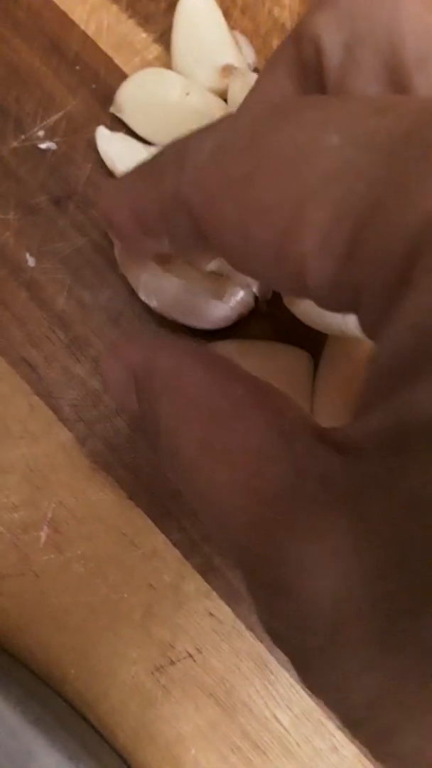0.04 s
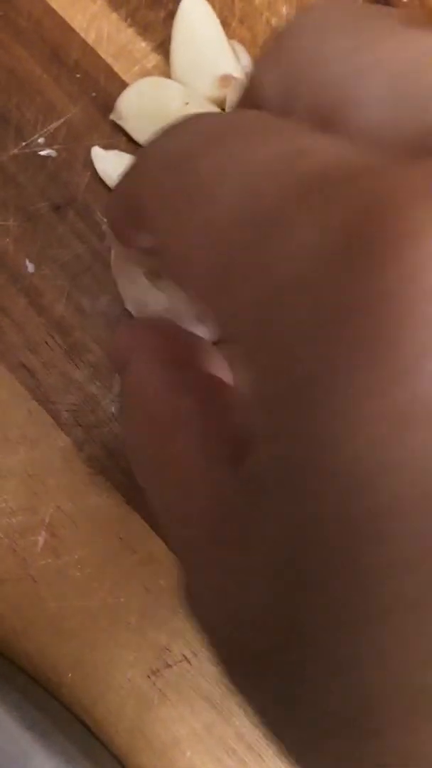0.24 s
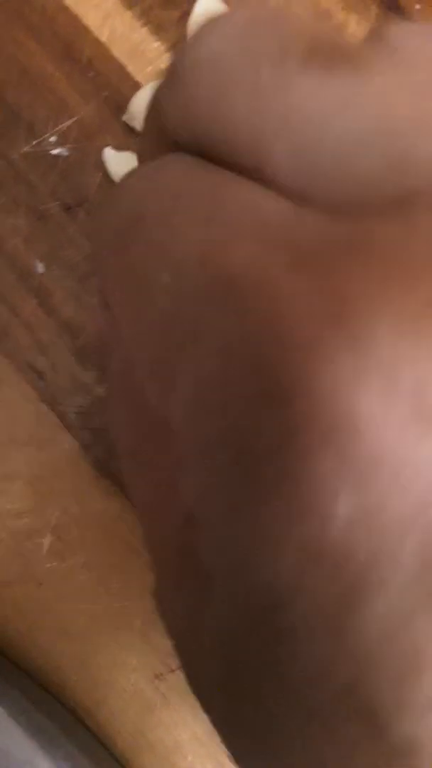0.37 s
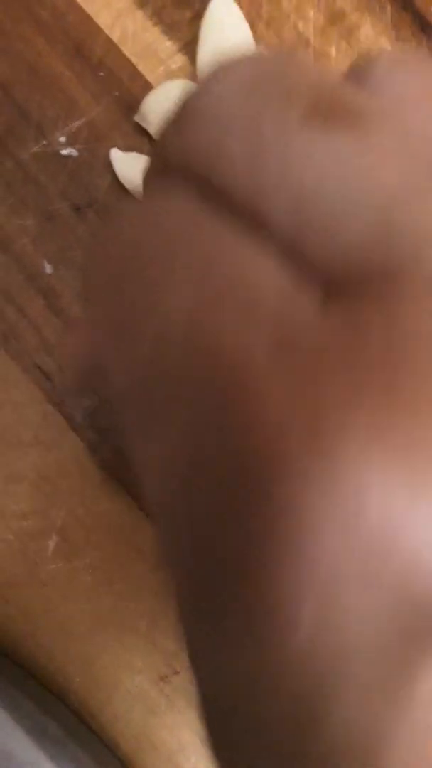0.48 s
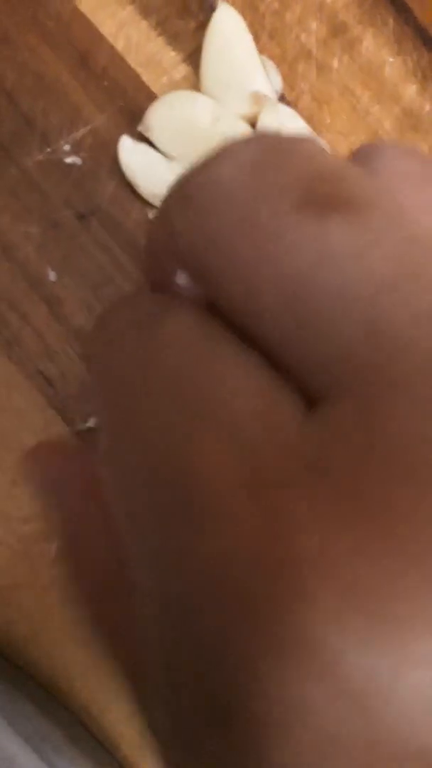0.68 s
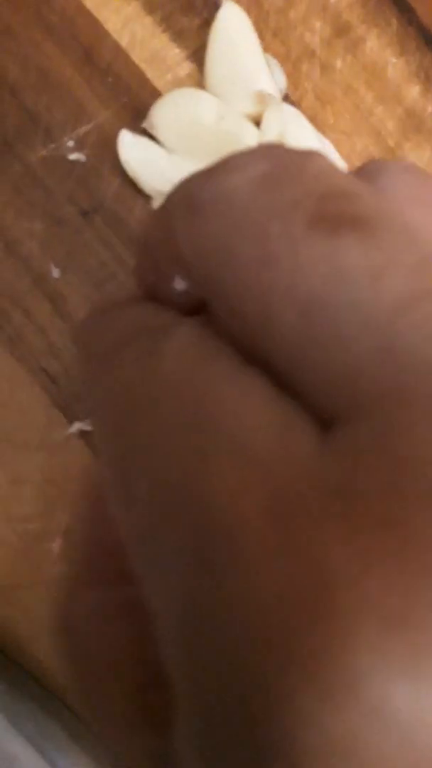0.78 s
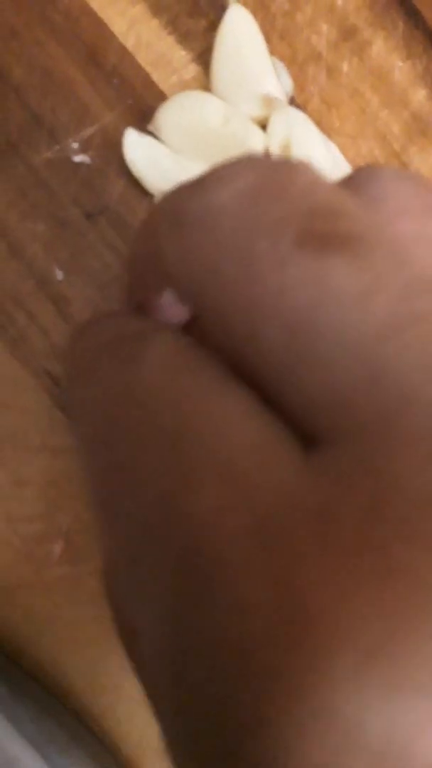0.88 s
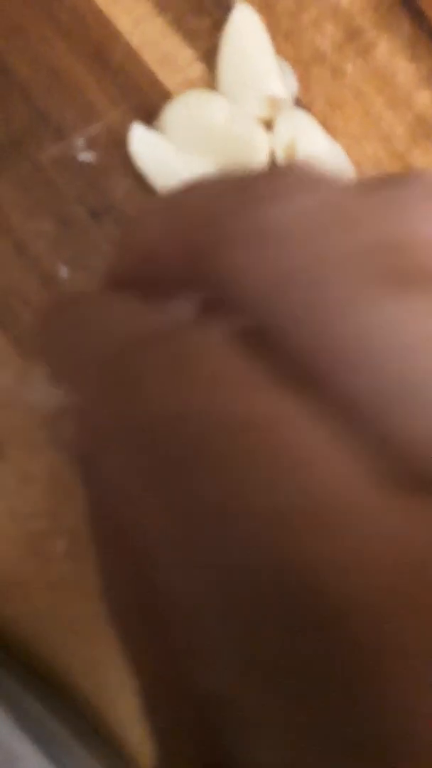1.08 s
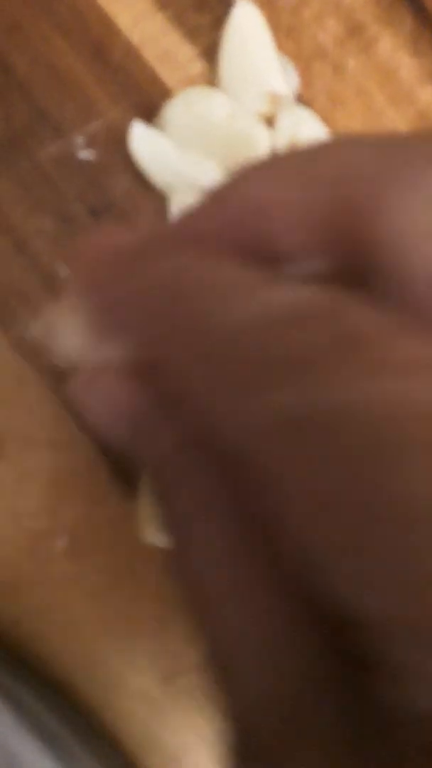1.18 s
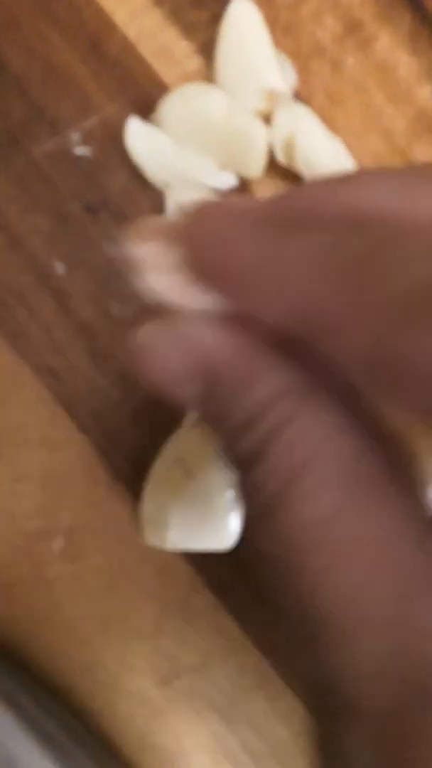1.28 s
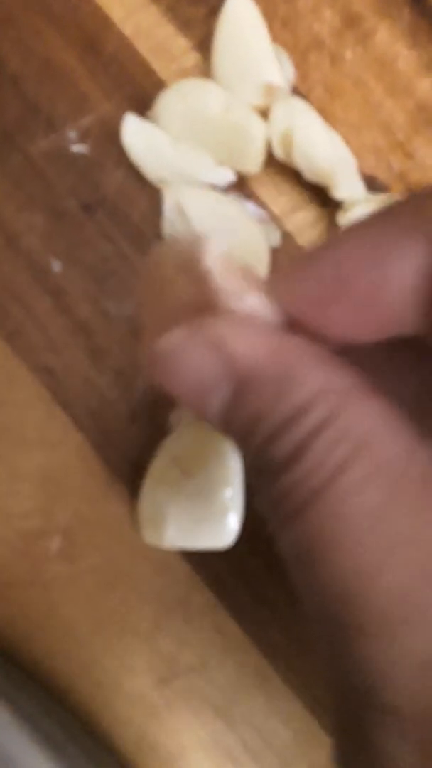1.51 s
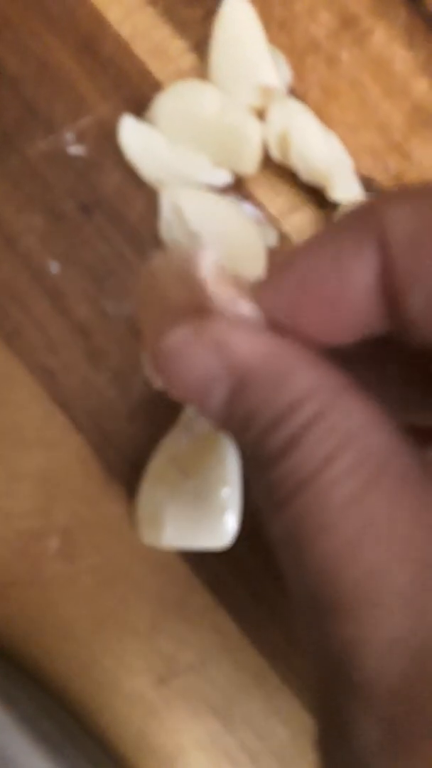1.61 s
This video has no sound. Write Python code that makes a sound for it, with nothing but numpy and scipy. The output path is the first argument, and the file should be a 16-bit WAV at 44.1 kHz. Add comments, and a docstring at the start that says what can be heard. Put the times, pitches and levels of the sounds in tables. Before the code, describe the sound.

Dry garlic skin crackles as fingers peel it, with one soft knock on wood.

```python
"""Dry, papery crackling: fingers peel garlic on a wooden board, close to a phone in a small kitchen.
The skin snaps in single cracks that ring its flakes, and tears in runs of tiny fractures.
Cloves stick and slip over the wood, and one lands with a knock that sets the board ringing.
Underneath, an appliance hums in the steady room noise."""
import sys
import numpy as np
from scipy import signal
from scipy.fft import rfft, irfft
from scipy.io import wavfile
from scipy.ndimage import map_coordinates

SR = 44100
rng = np.random.default_rng(int(sys.argv[2]) if len(sys.argv) > 2 else 0)


def store_wav(level_fs):
    """Save 16-bit WAV to argv[1]."""
    pcm = np.round(np.clip(np.atleast_2d(level_fs), -1, 1) * 32767)
    wavfile.write(sys.argv[1], SR, pcm.T.astype(np.int16))


N = 72765


def skin_cracks():
    """Each snap rings three broad resonances of its flake, which shivers briefly after."""
    # single snaps (time [s], level [dB], treble over the mid band [dB], left minus right [dB])
    snaps = [(0.0361, -52, -2.5, 10), (0.0963, -54, -5.5, 8), (0.2429, -45, 1, 14.5), (0.3478, -55.5),
             (0.3628, -49, 3, 1.5), (0.4546, -45.5, 10, 4), (0.5192, -49.5, -0.5, 1),
             (0.5852, -63, 9.5, -15), (0.5942, -55.5), (.9146, -47, 5.5, -2.5), (0.9305, -61.5),
             (0.9803, -53.5), (0.9995, -55), (1.0112, -51.5, 2, 6.5), (1.0745, -63), (1.1777, -47.5, 7, 10),
             (1.1976, -39.5, 3, 3.5), (1.2305, -48, -20, 2), (1.2475, -44, 3, 4.5), (1.31, -52),
             (1.3456, -42, 3, 1), (1.356, -38.5, 6.5, 6.5), (1.3868, -48.5, 12.5, 1.5), (1.563, -60),
             (1.5672, -59), (1.6146, -61), (1.6438, -47.5)]
    snaps = [(*row, 3.5, 0)[:4] for row in snaps]  # short rows: usual treble, centred
    resonances = [(3430, 890), (6930, 2250), (12580, 6500)]  # (centre [Hz], width [Hz])
    snap_s, shiver_s, shiver_db = .00065, .003, -13
    softening = .25  # faint cracks die more slowly: dB of decay time per dB of level
    loudest = max(db + max(treble_db, 0) for _, db, treble_db, _ in snaps)
    out, t = np.zeros((2, N)), np.arange(SR // 20) / SR
    for start, db, treble_db, pan_db in snaps:
        age = t / undb(softening * (loudest - db - max(treble_db, 0)))
        attack = 1 - np.exp(-age / .0001)
        envelope = attack * (np.exp(-age / snap_s) + undb(shiver_db) * np.exp(-age / shiver_s))
        tuning = 1 + .037 * rng.standard_normal()
        bands_db = (treble_db - 20, 0, treble_db)  # hard snaps fill the outer two resonances
        snap = 0
        for (hz, width), band_db in zip(resonances, bands_db):
            burst = envelope * rng.choice([-1, 1], (3, len(t)))
            ring = mic_ports(resonate(burst, hz * tuning, width))
            energy = np.sum(ring ** 2, axis=1, keepdims=True)
            snap = snap + undb(band_db) * ring / np.sqrt(energy / (.004 * SR))  # level over 4 ms
        add(out, start, undb(db) * pan(pan_db) * snap)
    return out


def skin_tears():
    """Tiny fractures run through the papery skin, bunching where it snags."""
    # runs of tearing and rustling (peak time [s], rise [s], fall [s], level [dB], tilt [dB/octave])
    runs = [(.04, 0.019, 0.026, -58, -4.5), (0.099, 0.019, 0.017, -55.5, -2), (.232, 0.015, 0.016, -56, -5),
            (0.244, 0.001, 0.038, -40, -2.8), (0.293, 0.015, 0.016, -30.7, 1.3),
            (.319, .008, 0.0029, -37.5, 3.5), (0.366, 0.06, 0.055, -52, -6),
            (0.458, 0.025, 0.036, -45.5, -4.5), (0.521, 0.002, 0.033, -49.5, -3),
            (0.589, 0.012, 0.02, -54, -4), (0.62, 0.0049, 0.028, -55, -5.5), (0.883, 0.053, 0.059, -59, -6),
            (1.002, 0.042, 0.03, -54.5, -1), (1.173, 0.015, 0.034, -49, -1),
            (1.199, 0.0032, 0.0083, -37.5, 0), (1.25, 0.075, 0.14, -55.5, -7.5),
            (1.37, 0.07, 0.06, -54, 0.5), (1.59, .11, .15, -63, 3)]
    # tone of the dry skin (frequency [Hz], level [dB])
    skin_tone = [(300, -30), (1200, -18), (2000, -3), (2700, -10.5), (4300, -1), (5300, 0.5), (7500, 1),
                 (9500, 0), (12500, 1), (16000, 2)]
    snag_s, snag_gain = .0009, 1.2
    thinning = .14  # light runs move only small flakes: dB of body lost per dB of level
    catches = np.abs(grains(per_s=300, spread_db=1.5)[0])
    snags = signal.lfilter([1], [1, -np.exp(-1 / (snag_s * SR))], catches)
    fractures = mic_ports(grains(per_s=6000, spread_db=2.2)) * (1 + snag_gain * snags)
    loudest = max(row[3] for row in runs)
    out = 0
    for peak, rise, fall, db, tilt_db in runs:
        flakes = colour(fractures, [(4800, thinning * (db - loudest)), (6800, 0)])
        out = out + undb(db) * swell(peak, rise, fall) * unit(colour(flakes, skin_tone, tilt_db))
    return pan(db=1.5) * out


def board_knocks():
    """A clove's dull contact rings the board's modes; a low, diffuse boom builds up in the room."""
    # a light touch, then a clove lands and rocks (time [s], level [dB])
    hits = [(.8225, -58.5), (1.1252, -36), (1.1333, -47)]
    # modes of the board (frequency [Hz], level [dB], t60 [s], left minus right [dB])
    modes = [(396.5, -14, 0.13, 11), (615, 0, 0.135, 0), (701, -4, 0.13, 13), (752, -6, 0.11, -9),
             (868, -9, 0.088, 9), (900, -1, 0.085, 4), (1347, -9, 0.115, -3), (1804, -6, 0.097, -8),
             (1940, -10, 0.086, -15)]
    # tone of the contact (frequency [Hz], level [dB])
    contact_tone = [(120, -8), (800, -6), (2000, -8.5), (2700, -24), (4000, -15), (16000, -40)]
    contact_db, contact_s = -1.5, .0055
    boom_db, boom_rise_s, boom_t60_s = -13.5, .02, .3
    out, t = np.zeros((2, N)), np.arange(SR // 2) / SR
    ring = 0
    for k, (hz, db, t60, pan_db) in enumerate(modes):
        polarity = (-1) ** ((k + 1) // 2)
        ring = ring + polarity * pan(pan_db) * undb(db - 60 * t / t60) * np.sin(2 * np.pi * hz * t)
    boom = unit(mic_ports(resonate(rng.standard_normal((3, len(t))), hz=340, width=320)))
    boom *= (1 - np.exp(-t / boom_rise_s)) * undb(boom_db - 60 * t / boom_t60_s)
    attack = 1 - np.exp(-t / .0006)
    for start, db in hits:
        contact = unit(colour(rng.standard_normal((2, len(t))), contact_tone)) * np.exp(-t / contact_s)
        add(out, start, undb(db) * attack * (ring + undb(contact_db) * contact + boom))
    return out


def clove_slides():
    """Cloves stick and slip on the wood, sounding resonances that drift as the contact moves."""
    # pushes across the board (peak time [s], rise [s], fall [s], level [dB])
    pushes = [(.28, 0.04, .04, -51.5), (.326, 0.0063, 0.005, -51), (.375, .02, .05, -58),
              (0.469, 0.02, 0.027, -51.5), (0.527, 0.01, 0.027, -51.5), (.582, 0.035, 0.018, -54.5),
              (0.863, 0.032, 0.034, -60.5), (1.02, 0.029, 0.08, -62.5), (1.199, 0.045, 0.042, -55)]
    # tone of the rubbed wood (frequency [Hz], level [dB])
    wood_tone = [(90, -42), (740, -3), (920, 8), (1160, -13), (1430, 0), (1680, -14), (1960, -4.5),
                 (3000, -19), (4650, -3), (6000, -18)]
    pressure = np.sqrt(sum((undb(db) * swell(peak, rise, fall)) ** 2 for peak, rise, fall, db in pushes))
    slips = grains(per_s=4100, spread_db=2.5)
    rub = colour(slips[0] + .5 * slips[1:], wood_tone)  # the wide board reaches both mic ports at once
    position = np.cumsum(1 + .012 * waver())  # pitch drifts by about 1.2 %
    drifting = [map_coordinates(port, [position], mode="mirror") for port in rub]
    return pressure * unit(np.array(drifting))


def hand_echoes(x):
    """Hands and board throw back a few very early echoes, different for each mic port."""
    latest_s, echo_db, count = .003, -6.5, 6
    echoes = np.zeros((2, int(latest_s * SR) + 1))
    for port in echoes:
        strengths = undb(echo_db) * rng.choice([-1, 1], count)
        delays = (rng.uniform(.15, 1, count) * (len(port) - 1)).astype(int)
        port[delays] = strengths
    echoes[:, 0] = 1  # direct sound
    return signal.fftconvolve(x, echoes / np.linalg.norm(echoes[0]), axes=1)[:, :N]


def kitchen_reverb(x, wet_db, t60_s=.22):
    """The small kitchen adds a short, diffuse ring."""
    t = np.arange(SR // 2) / SR
    tail = rng.standard_normal((2, len(t))) * undb(-60 * t / t60_s) * (1 - np.exp(-t / .0015))
    return x + undb(wet_db) * signal.fftconvolve(x, unit(tail) / np.sqrt(len(t)), axes=1)[:, :N]


def room_noise(level_db=-64):
    """A steady bed of noise, narrow in the bass and wider in the treble."""
    # tone of the kitchen's background (frequency [Hz], level [dB])
    room_tone = [(30, -18), (60, -3.5), (105, 4), (200, -9), (300, -6), (620, -7), (800, -17.5),
                 (1400, -24), (1950, -15), (2600, -27.5), (7000, -25), (16000, -31)]
    mid, side = colour(rng.standard_normal((2, N)), room_tone)
    side = colour(side, [(60, -14), (1050, -1)])
    return undb(level_db) * unit(np.array([mid + side, mid - side]))


def appliance_hum(waver_depth=.41):
    """An appliance hums on one low note that wavers in level."""
    # the hum's note (frequency [Hz], level [dB])
    hum_notes = [(118.4, -68)]
    t = np.arange(N) / SR
    hum = sum(undb(db) * np.sqrt(2) * np.sin(2 * np.pi * hz * t) for hz, db in hum_notes)
    return hum * (1 + waver_depth * waver())


def grains(per_s, spread_db):
    """Random tiny impulses, mostly weak and a few strong, with three independent sets of signs."""
    sizes = undb(spread_db * np.minimum(rng.exponential(size=N), 4))
    fires = rng.random(N) < per_s / SR
    return sizes * fires * rng.choice([-1, 1], (3, N))


def swell(peak, rise, fall):
    """Finger pressure builds up and lets go."""
    t = np.arange(N) / SR - peak
    return np.exp(-np.abs(t / np.where(t < 0, rise, fall)) ** 1.63)


def waver():
    """A slow random wobble with rms 1."""
    return unit(colour(rng.standard_normal(N), [(12, 0), (40, -40), (200, -100)]))


def mic_ports(three, share=.62, lag_s=.00027):
    """One shared and two separate signals make left and right; the right is slightly late."""
    left, right = np.sqrt(share) * three[0] + np.sqrt(1 - share) * three[1:]
    return np.array([left, np.roll(right, int(lag_s * SR))])


def colour(x, points, tilt_db=0):
    """Equalise by (frequency [Hz], level [dB]) points and a tilt per octave."""
    length = x.shape[-1]
    octave = np.log2(np.arange(length // 2 + 1) * SR / length + 1)
    hz, db = np.array(points).T
    curve_db = np.interp(octave, np.log2(hz), db) + tilt_db * octave
    return irfft(rfft(x) * undb(curve_db), length)


def resonate(x, hz, width):
    """A steep band-pass resonance."""
    edges = [max(hz - width / 2, 20), min(hz + width / 2, SR / 2 - 20)]
    return signal.sosfilt(signal.butter(2, edges, "band", fs=SR, output="sos"), x)


def undb(db):
    """Decibels to gain."""
    return 10 ** (np.asarray(db) / 20)


def unit(x):
    """Scale to rms 1."""
    return x / np.sqrt(np.mean(x ** 2))


def pan(db):
    """Left and right gains for a level difference."""
    return undb(np.array([[db], [-db]]) / 2)


def add(out, start_s, x):
    """Mix a sound in at a time."""
    i = int(start_s * SR)
    out[:, i:i + x.shape[1]] += x[:, :max(N - i, 0)]


def scene():
    """Close peeling and roomier knocks over the kitchen's noise and hum."""
    peeling = kitchen_reverb(skin_cracks() + hand_echoes(skin_tears()) + clove_slides(), wet_db=-13)
    knocks = kitchen_reverb(board_knocks(), wet_db=-9)
    return peeling + knocks + room_noise() + appliance_hum()


def record(dry):
    """The phone cuts the deep bass and the very top."""
    bottom_hz, top_hz = 45.7, 15950
    thin = signal.sosfilt(signal.butter(2, bottom_hz, "high", fs=SR, output="sos"), dry)
    return signal.sosfilt(signal.ellip(10, .2, 70, top_hz, fs=SR, output="sos"), thin)


dry = scene()
out = record(dry)
store_wav(out)
```